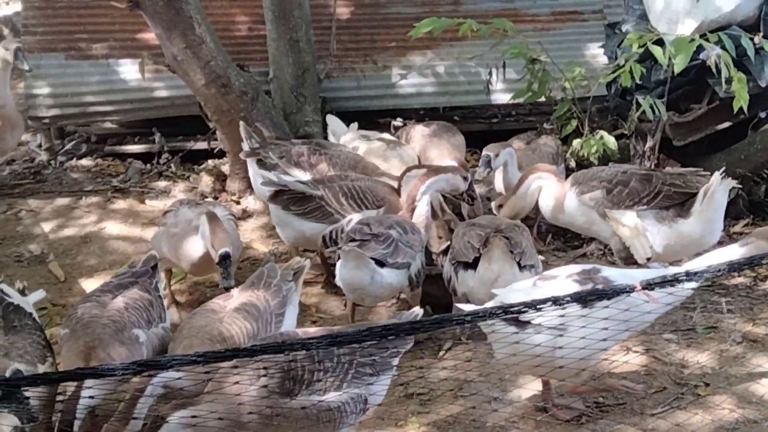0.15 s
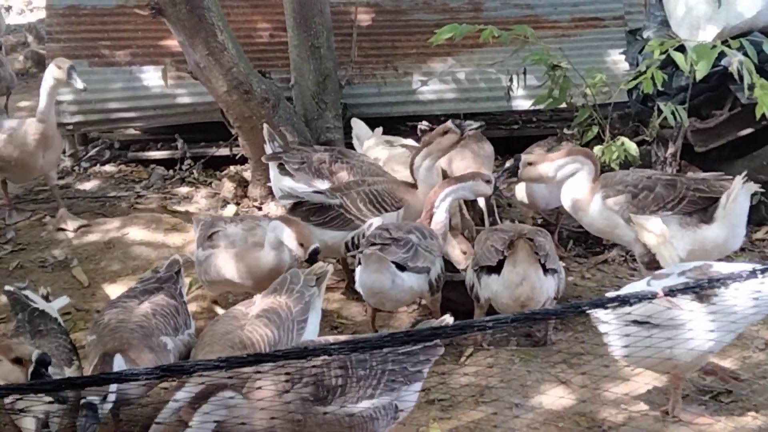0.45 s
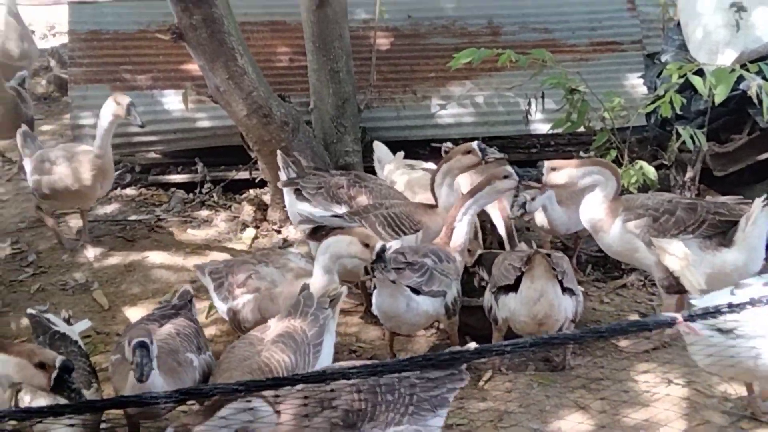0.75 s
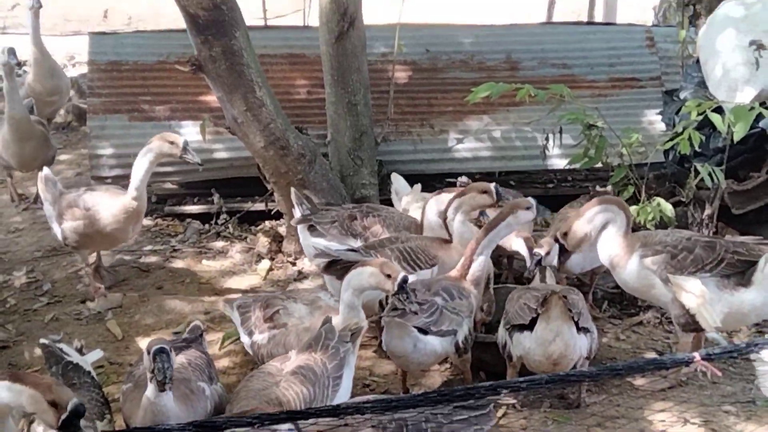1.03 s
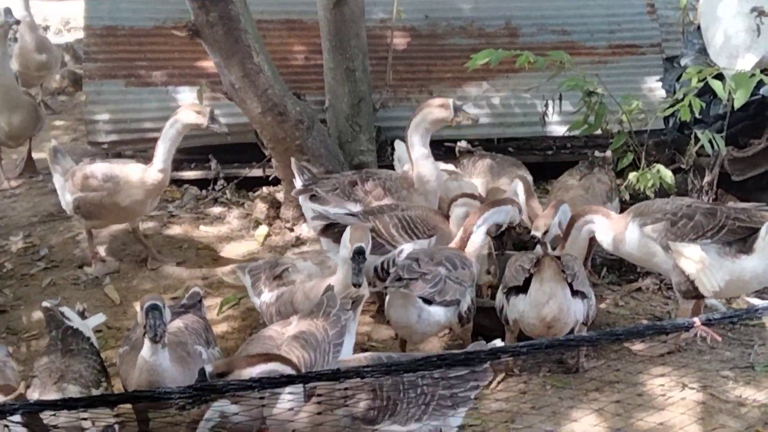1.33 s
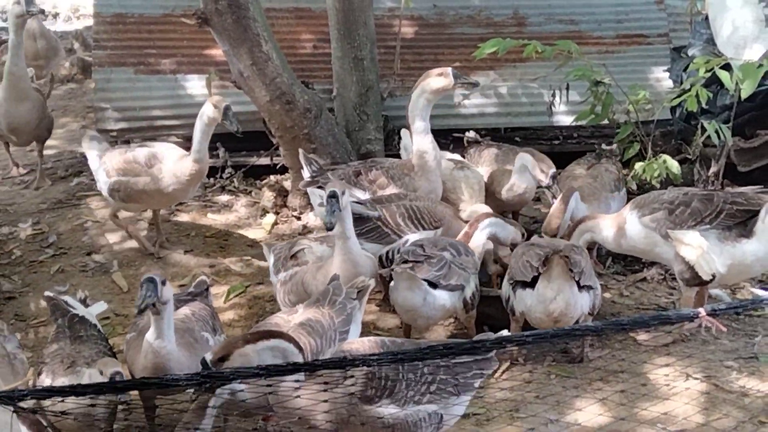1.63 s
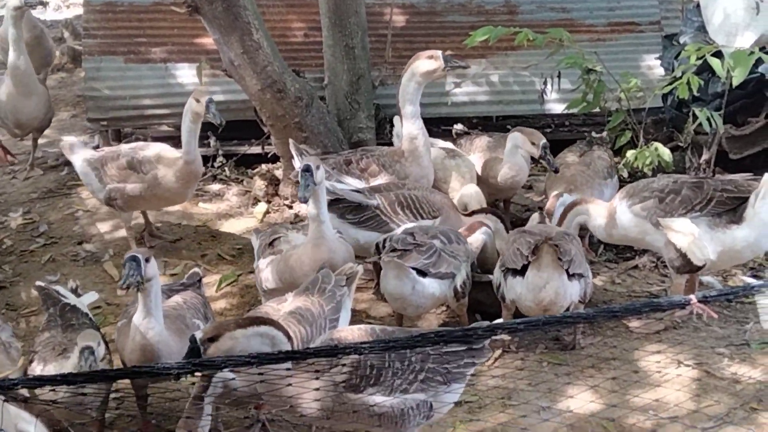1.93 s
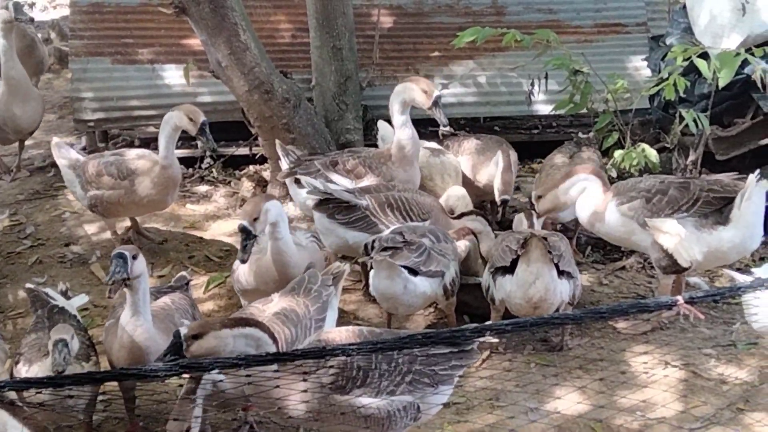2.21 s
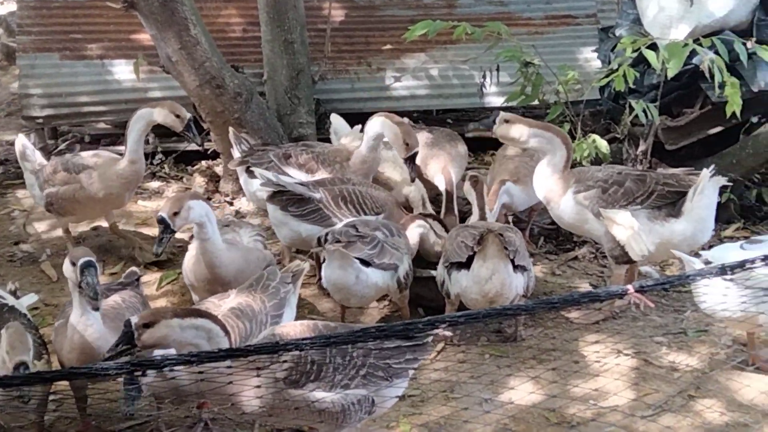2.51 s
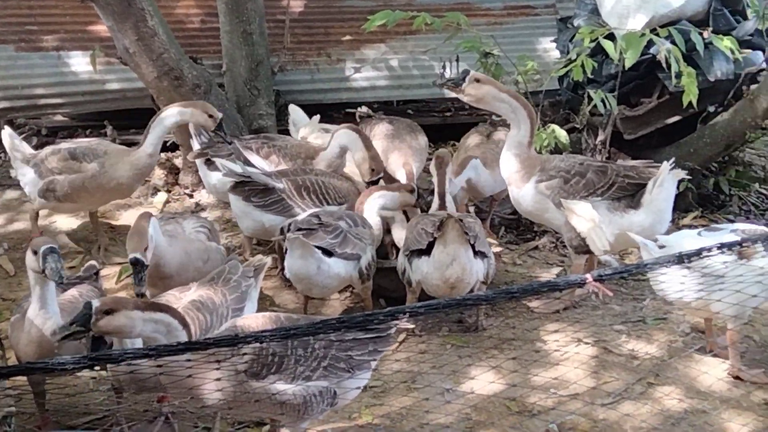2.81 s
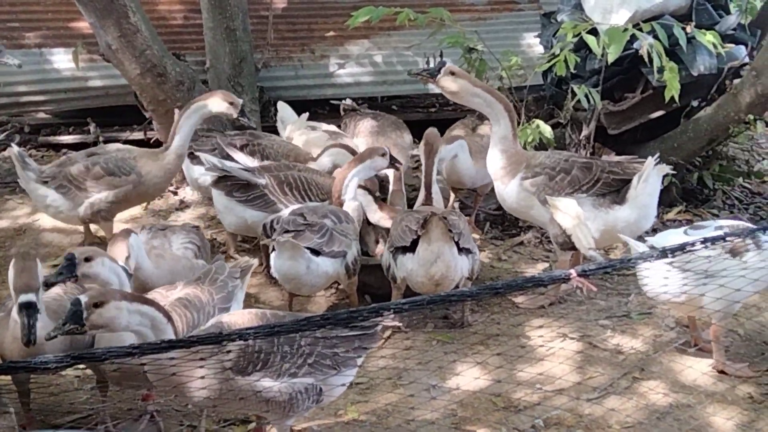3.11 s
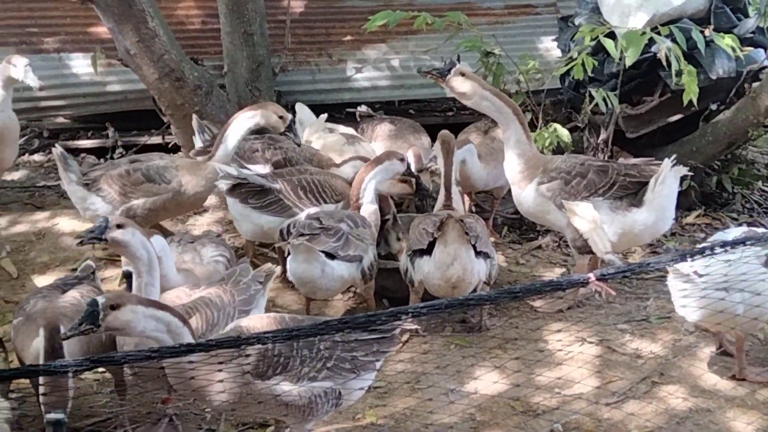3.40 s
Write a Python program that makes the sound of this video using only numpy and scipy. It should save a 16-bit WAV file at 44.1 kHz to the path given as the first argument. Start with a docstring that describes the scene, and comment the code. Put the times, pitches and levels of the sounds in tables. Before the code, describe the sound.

In an open farm pen, geese honk four times, pause, then give one long honk and one short one. A low rumble and thin hiss lie underneath, with a few small ticks and distant birds whistling.

```python
"""A low rumble, a hum and a narrow high hiss lie over an open pen fenced with sheet metal. Four goose honks
follow in quick succession: trains of syrinx pulses, from clean to rasping, ring in a long throat and reflect
round the pen, with three ticks of bills and feet among them. From the first second on, young birds peep in thin
glides, and the background sinks as the geese pause. A long honk and a short one follow, the hiss returns, and
two more whistles end the scene."""
import sys
import numpy as np
from scipy import signal
from scipy.fft import rfft, irfft
from scipy.io import wavfile
from scipy.ndimage import uniform_filter1d

SR = 44100
rng = np.random.default_rng(int(sys.argv[2]) if len(sys.argv) > 2 else 0)


def dump(signal):
    """Clip the signal to [-1, 1] and save it as 16-bit WAV at the path in sys.argv[1]."""
    limited = np.clip(np.atleast_2d(signal).T, -1, 1)
    pcm = np.round(limited * 32767).astype(np.int16)
    wavfile.write(sys.argv[1], SR, pcm)


N = 156555
T = np.arange(N) / SR

# Spectral shapes of the rumble and the hiss: frequency_hz, relative_density_db
RUMBLE_SPECTRUM = [(25, 4.5), (70, 2), (110, -5.5), (190, -6), (290, -21), (500, -25), (1500, -34),
                   (4000, -32.5), (15000, -67)]
HISS_SPECTRUM = [(500, -12), (1500, -10), (2800, -16), (6500, -11.5), (7500, -4.5), (8400, 5.5), (9600, -6),
                 (13000, -13)]
# Envelopes of the rumble, the hiss and the hum: time_s, level_db
RUMBLE_LEVELS = [(0, -52.5), (1.4, -58.5), (2.0, -62.5), (3.55, -63.5)]
HISS_LEVELS = [(0, -62), (.74, -63.5), (1.55, -64.5), (2.0, -71.5), (2.6, -72.5), (3.1, -67.5),
               (3.55, -63.5)]
HUM_LEVELS = [(0, -58.5), (2.0, -73.5)]
# Swell and timbre of each honk: start_s, crest_s, stop_s, crest_db, rise_db, sag_db,
# relative_fundamental_db, treble_db_per_swell_db, allpass_coefficient
HONKS = [(.125, 0.233, 0.27, -44, 11, 8, -12, 1.2, 0.49),
         (.494, 0.592, 0.62, -42.5, 1.5, 3, -16.5, 1.8, 0.36),
         (.899, 0.964, 0.99, -51, 3, 3.5, -5.5, 1.5, 0.4),
         (1.209, 1.32, 1.345, -48, 5, -1.5, -17, 0.36, 0.39),
         (2.44, 2.676, 2.919, -49, 18, 4.5, -29, 0.86, 0.48),
         (3.226, 3.39, 3.404, -44.5, 9.5, -0.5, -19, 1.4, 0.34)]
# Vibration of the syrinx, one curve a honk: time_s, pitch_hz, roughness_0_to_1
SYRINX_CURVES = [
    [(.12, 147.6, 0.69), (.165, 138.9, 0.34), (.21, 140.4, 0.11), (.255, 141.1, 0.2), (.28, 134.6, 0.56)],
    [(.493, 120.1, 0.37), (.53, 139.2, 0.49), (.55, 174.4, 0.27), (.585, 183.5, 0.45), (.635, 180.5, 0.42),
     (.68, 169.7, 0.7)],
    [(.89, 150.2, 0.7), (.94, 149.1, 0.4), (.97, 183.3, 0.53), (1.04, 178.6, 0.38)],
    [(1.2, 147.7, 0.75), (1.25, 151, 0.44), (1.3, 156.7, 0.21), (1.32, 149.6, 0.25), (1.42, 148.5, 0.65)],
    [(2.43, 147.9, 0.28), (2.5, 168, 0.29), (2.6, 174.8, 0.45), (2.65, 178.6, 0.49), (2.8, 187.1, 0.48),
     (2.9, 182.4, 0.49), (2.97, 175.5, 0.28)],
    [(3.22, 158.8, 0.6), (3.24, 164.6, 0.32), (3.268, 155.7, 0.52), (3.287, 166.2, 0.12),
     (3.37, 170.9, 0.16), (3.41, 167.8, 0.44), (3.45, 163.6, 0.23)],
]
# Resonances of throat and bill, one curve a honk: frequency_hz, gain_db
THROAT_SPECTRA = [
    [(410, -10), (560, -3.5), (700, -12.5), (850, -4.5), (1130, -6), (1420, -1.5), (1830, -8.5), (1970, 6),
     (2200, -15.5), (3300, -20), (3850, -13.5), (6300, -30.5), (9000, -26), (12000, -49)],
    [(380, -11.5), (540, -2.5), (900, -2.5), (1280, 4.5), (1520, 5), (2100, -10.5), (2650, -21.5),
     (3900, -10), (4500, -19.5), (5200, -15.5), (6800, -26), (8100, -11), (9300, -16), (11500, -54)],
    [(400, -3), (600, -5.5), (1050, -4.5), (1300, 0), (1800, -7.5), (2700, -27.5), (3650, -13.5),
     (4600, -29), (8500, -16.5), (11000, -53)],
    [(400, -16), (750, -12), (850, -29), (930, 0), (1070, 5), (1200, -13.5), (1900, -11), (3650, -19.5),
     (5500, -28.5), (8600, -16), (11000, -27.5), (15000, -28.5)],
    [(380, -32), (520, -4), (700, -20.5), (900, 4.5), (1020, -3), (1160, -2), (1280, -7.5), (1620, -3.5),
     (2300, -16), (3100, -18.5), (3900, -14.5), (4900, -20), (11000, -28), (15000, -34.5)],
    [(340, -20.5), (510, -5), (680, -21), (850, -6.5), (1020, 2.5), (1360, -2.5), (1900, -17.5), (2190, -8),
     (2380, -18), (3650, -13.5), (5300, -26), (6250, -49), (8400, -14.5), (11000, -40.5)],
]
# Detours round the body and the ground: delay_s
DETOURS = [.0007, .0013, .0023]
# Ticks of bills and feet: start_s, level_db
TICKS = [(0.176, -47), (1.161, -55.5), (1.232, -50)]
# Peeps of young birds: start_s, length_s, first_hz, middle_hz, last_hz, level_db
WHISTLES = [ (0.993, 0.13, 2450, 2190, 1608, -70), (1.628, 0.086, 1350, 2062, 2230, -67),
            (1.724, 0.13, 2330, 2070, 1750, -67.5), (2.139, 0.096, 4650, 4090, 2680, -67.5),
            (3.431, 0.0766, 2050, 1980, 1860, -65), (3.524, 0.036, 4320, 3030, 2580, -63)]

PITCH_WOBBLE, JITTER_S, SHIMMER_DB = .05, .00019, 3.5   # standard deviations at full roughness
AIR_GAIN, AIR_FROM_HZ, AIR_DECAY_CYCLES = .38, 560, 0.2
WINDPIPE_SPACING_HZ, WINDPIPE_FULL_HZ, WINDPIPE_RIPPLE_DB = 355.6, 2400, 4.2
THROAT_FROM_HZ, TREBLE_FROM_HZ, CREAK_BELOW_HZ = 400, 1200, 146
ATTACK_S, RELEASE_DB_PER_S, SWELL_POWER = 0.0088, 329, 1.9
FLICKER_DB, FLICKER_PER_S = 8, 55
FENCE_T60_S, PEN_T60_S, ECHO_DULL_HZ = 0.112, 0.61, 4400


def from_db(db):
    """Amplitude grows tenfold for every 20 dB."""
    return 10 ** (np.asarray(db) / 20)


def unit_power(x):
    """Division by the RMS value gives unit power."""
    return x / np.sqrt(np.mean(x ** 2) + 1e-20)


def in_time(rows):
    """Linear interpolation gives each column of a curve at every sample."""
    times, *columns = np.transpose(rows)
    return [np.interp(T, times, column) for column in columns]


def cut(x, hz, kind, order=2):
    """A Butterworth filter falls 6 dB an octave per order beyond its corner."""
    return signal.sosfilt(signal.butter(order, hz, kind, fs=SR, output="sos"), x)


def drift(per_s, t=T, count=4096):
    """Interpolated random values form a slow modulation of unit variance."""
    return np.interp(t * per_s, np.arange(count), rng.standard_normal(count)) / np.sqrt(2 / 3)


def colour(x, spectrum, ripple_db=0):
    """Minimum-phase filtering imposes a spectrum; ripple adds a pipe's evenly spaced resonances."""
    size = 4096
    hz, db = np.transpose(spectrum)
    grid_hz = np.maximum(np.arange(size // 2 + 1) * SR / size, 1)
    shape_db = np.interp(np.log(grid_hz), np.log(hz), db)
    depth_db = ripple_db * np.clip(2 * grid_hz / WINDPIPE_FULL_HZ - 1, 0, 1)
    pipe_db = depth_db * np.cos(2 * np.pi * grid_hz / WINDPIPE_SPACING_HZ)
    cepstrum = irfft(np.log(from_db(shape_db + pipe_db)))
    cepstrum[1:size // 2] *= 2   # folding the cepstrum makes the filter causal
    cepstrum[size // 2 + 1:] = 0
    return signal.fftconvolve(x, irfft(np.exp(rfft(cepstrum))))[:N]


def background(hum_hz=82.7):
    """Spectral shaping turns white noise into rumble and hiss; a wavering sinusoid gives the hum."""
    rumble = unit_power(colour(rng.standard_normal(N), RUMBLE_SPECTRUM))
    rumble *= from_db(in_time(RUMBLE_LEVELS)[0])
    hiss = unit_power(colour(rng.standard_normal(N), HISS_SPECTRUM))
    hiss *= from_db(in_time(HISS_LEVELS)[0] + drift(13))
    hum_phase = 2 * np.pi * np.cumsum(hum_hz * (1 + 0.0217 * drift(11))) / SR
    hum = unit_power(np.sin(hum_phase)) * from_db(in_time(HUM_LEVELS)[0])
    return rumble + hiss + hum


def syrinx(cycles, roughness):
    """A vibrating valve emits a pulse and a puff of air each cycle; jitter and shimmer make it rasp."""
    onsets = np.flatnonzero(np.diff(np.floor(cycles)))
    jitter, shimmer = rng.standard_normal((1024, 2))[:len(onsets)].T * roughness[onsets]
    onsets = onsets + np.round(JITTER_S * SR * jitter).astype(int)
    pulses = np.zeros(N)
    pulses[np.clip(onsets, 0, N - 1)] = from_db(SHIMMER_DB * shimmer)
    puffs = unit_power(rng.standard_normal(N) * np.exp(-(cycles % 1) / AIR_DECAY_CYCLES))
    air = AIR_GAIN * np.sqrt(roughness) * cut(puffs, AIR_FROM_HZ, "high", order=1)
    return unit_power(pulses) + air


def scatter(x, coefficient):
    """Allpass delays spread each pulse in time and preserve its magnitude spectrum."""
    for delay_s in DETOURS:
        feedback = np.r_[1, np.zeros(int(delay_s * SR)), coefficient]
        x = signal.lfilter(feedback[::-1], feedback, x)
    return x


def flicker(x, roughness, start, stop):
    """Independent amplitude modulation of narrow bands breaks up rough overtones, the low ones less."""
    centres_hz = np.geomspace(900, 12000, 32)
    span = slice(int((start - .02) * SR), int((stop + .1) * SR))
    size = 2 ** 15
    t, spectrum = T[span], rfft(x[span], size)
    hz = np.arange(size // 2 + 1) * SR / size
    out = np.zeros(N)
    for centre_hz, weights in zip(centres_hz, np.eye(len(centres_hz))):
        band = irfft(spectrum * np.interp(hz, centres_hz, weights))[:len(t)]
        depth_db = FLICKER_DB * roughness[span] * min(centre_hz / WINDPIPE_FULL_HZ, 1)
        out[span] += band * from_db(depth_db * drift(FLICKER_PER_S, t, count=512))
    return out


def effort(start, crest, stop, rise_db, sag_db):
    """The envelope, in dB relative to the crest: power-law swell and sag, then exponential decay."""
    swell = np.clip((crest - T) / (crest - start), 0, 1) ** SWELL_POWER
    sag = np.clip((T - crest) / (stop - crest), 0, 1) ** 2
    return -rise_db * swell - sag_db * sag - RELEASE_DB_PER_S * np.maximum(T - stop, 0)


def open_bill(voice, swell_db, brightening):
    """An opening bill tilts the spectrum toward the treble; short-term power is held at one."""
    bass = cut(voice, TREBLE_FROM_HZ, "low", order=4)
    bass = cut(bass[::-1], TREBLE_FROM_HZ, "low", order=4)[::-1]   # backward pass cancels the phase lag
    treble_db = brightening * np.maximum(swell_db + 2.5, -12)
    voice = bass + (voice - bass) * from_db(treble_db)
    power = np.abs(uniform_filter1d(voice ** 2, size=1100))
    return voice / np.sqrt(power + 1e-12)


def honk(row, syrinx_curve, throat_spectrum):
    """Source and filter: syrinx pulses excite the throat's resonances, over a sinusoidal fundamental."""
    start, crest, stop, crest_db, rise_db, sag_db, fundamental_db, brightening, allpass = row
    effort_db = effort(start, crest, stop, rise_db, sag_db)
    pitch_hz, roughness = in_time(syrinx_curve)
    cycles = np.cumsum(pitch_hz * (1 + PITCH_WOBBLE * roughness * drift(70))) / SR
    cycles -= cycles[int(start * SR)]
    voice = colour(syrinx(cycles, roughness), throat_spectrum, WINDPIPE_RIPPLE_DB)
    voice = scatter(cut(voice, THROAT_FROM_HZ, "high"), allpass)
    voice = flicker(voice, roughness, start, stop)
    voice = open_bill(voice, effort_db * (T < crest), brightening)
    flutter_db = 3.5 * roughness * drift(130)
    creak_db = 80 * np.maximum(1 - pitch_hz / CREAK_BELOW_HZ, 0) * (cycles % 1)
    voice *= from_db(flutter_db - creak_db)   # slow pulses come apart into snaps
    fundamental = from_db(fundamental_db) * unit_power(np.sin(2 * np.pi * cycles))
    attack = np.clip((T - start) / ATTACK_S + .5, 0, 1)
    return (voice + fundamental) * from_db(crest_db + effort_db) * attack


def echoes(x, t60_s):
    """Diffuse reflections arrive after 4 ms, dulled in the treble, and decay exponentially."""
    envelope = from_db(-60 * T[:SR] / t60_s) * (T[:SR] > .004)
    response = cut(rng.standard_normal(SR) * envelope, ECHO_DULL_HZ, "low", order=1)
    return signal.fftconvolve(x, response / np.sqrt(np.sum(response ** 2)))[:N]


def ticks(t60_s=0.042, from_hz=230):
    """Small impacts of bills and feet give broadband bursts that decay exponentially."""
    envelope = sum((T >= start) * from_db(level_db - 60 * np.clip(T - start, 0, 1) / t60_s)
                   for start, level_db in TICKS)
    return cut(envelope * rng.standard_normal(N), from_hz, "high", order=1)


def whistle(start, length, first_hz, middle_hz, last_hz, level_db, octave_db=-16, fade_s=0.021):
    """Random frequency and amplitude modulation make a bird's parabolic glide sound husky."""
    parabola = np.polyfit([0, .5, 1], [first_hz, middle_hz, last_hz], 2)
    glide_hz = np.polyval(parabola, np.clip((T - start) / length, 0, 1))
    phase = 2 * np.pi * np.cumsum(glide_hz * (1 + .045 * drift(520))) / SR
    tone = np.sin(phase) + from_db(octave_db) * np.sin(2 * phase)
    flutter_db = 4 * drift(260)
    gate = np.clip(np.minimum(T - start, start + length - T) / fade_s + .5, 0, 1)
    return unit_power(tone * from_db(flutter_db)) * gate * from_db(level_db)


def scene():
    """Superposition: direct sound, early fence echoes and the pen's reverberation add to the background."""
    geese = sum(honk(*call) for call in zip(HONKS, SYRINX_CURVES, THROAT_SPECTRA)) + ticks()
    birds = from_db(-1) * sum(whistle(*row) for row in WHISTLES)
    early = echoes(from_db(-10) * geese + from_db(-9) * birds, FENCE_T60_S)
    late = echoes(from_db(-23) * geese + from_db(-10) * birds, PEN_T60_S)
    return (geese + birds + early + late + background())[None]


def record(dry):
    """Band limiting: an elliptic low-pass cuts the highest treble steeply."""
    cutoff_hz = 15550
    return signal.sosfilt(signal.ellip(12, .1, 80, cutoff_hz, fs=SR, output="sos"), dry)


dry = scene()
out = record(dry)
dump(out)
```